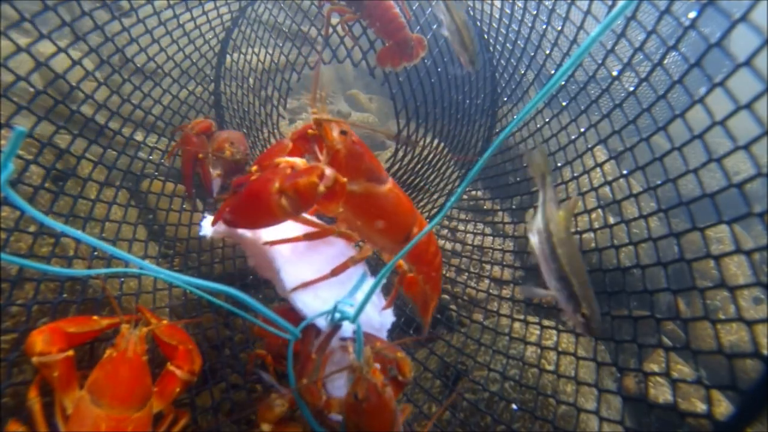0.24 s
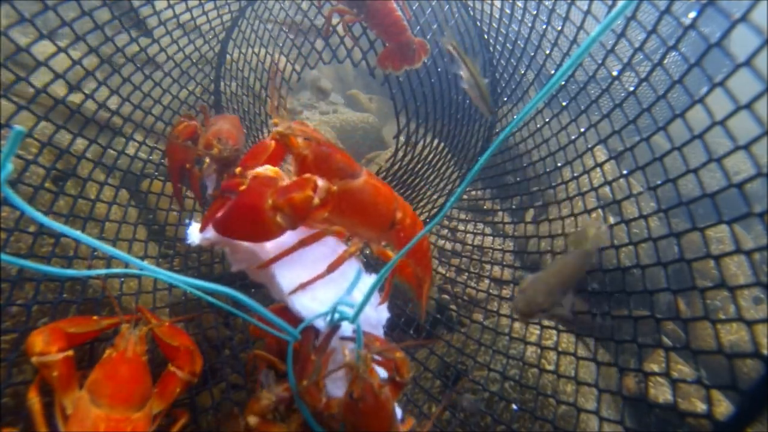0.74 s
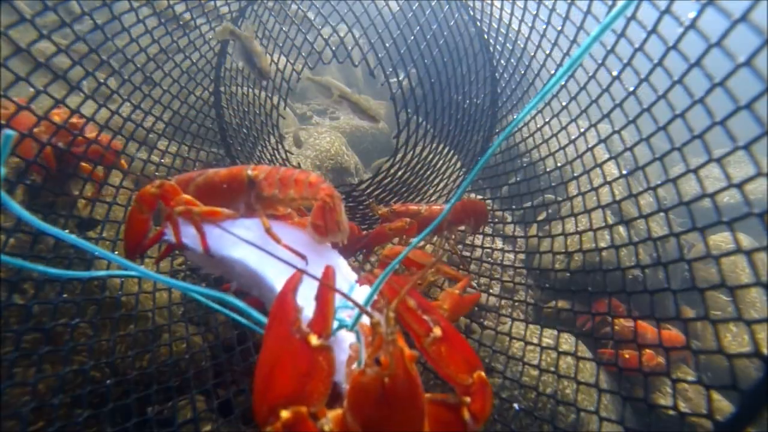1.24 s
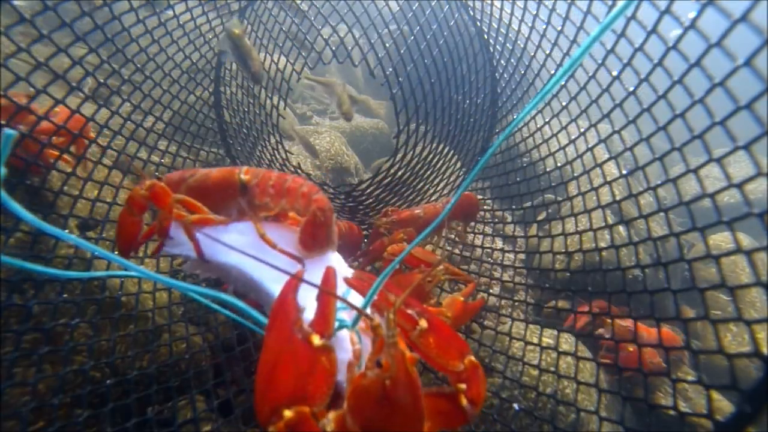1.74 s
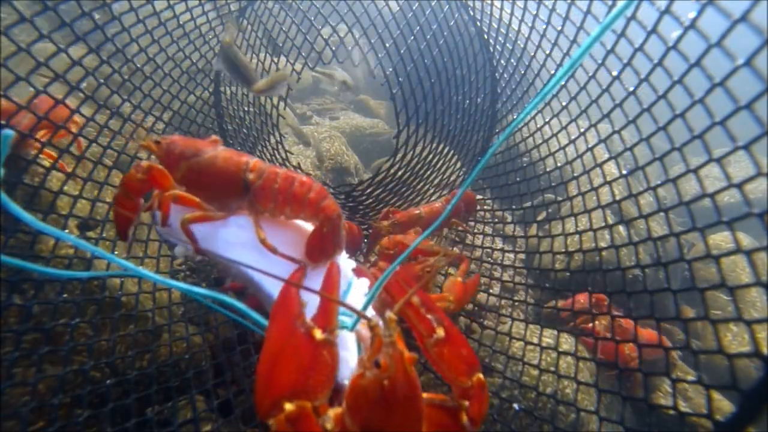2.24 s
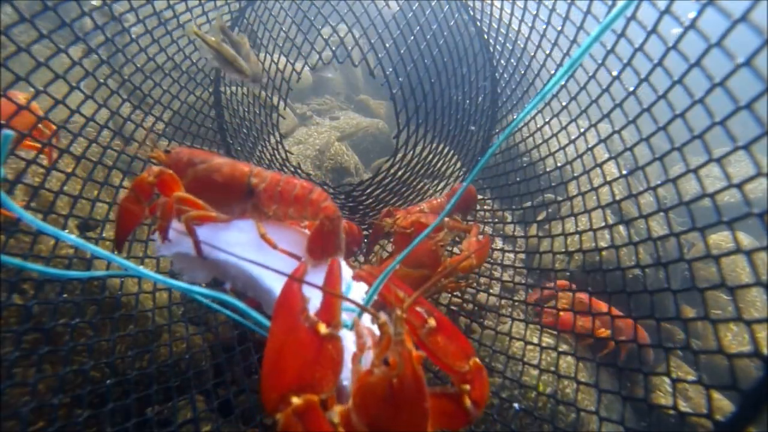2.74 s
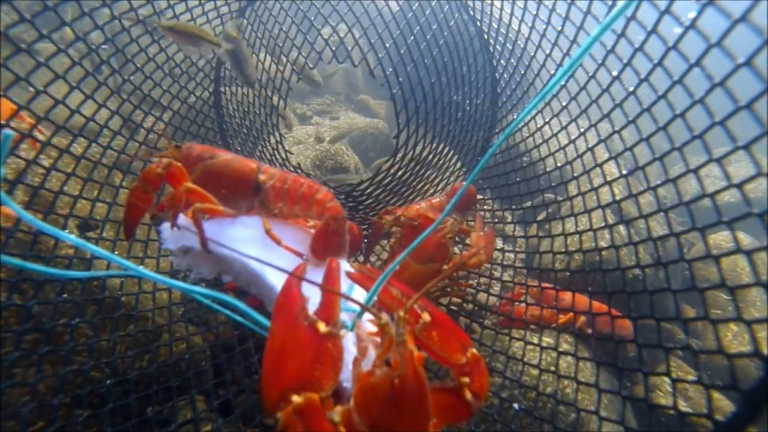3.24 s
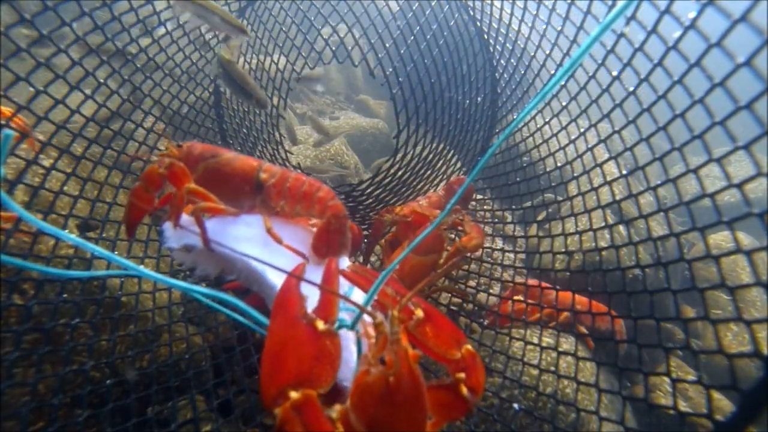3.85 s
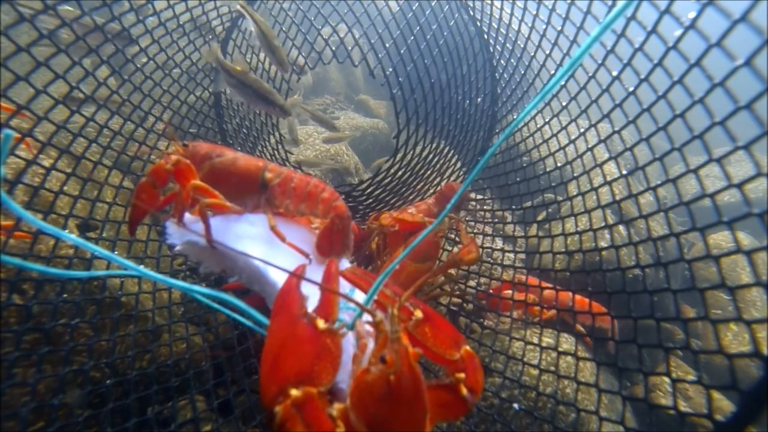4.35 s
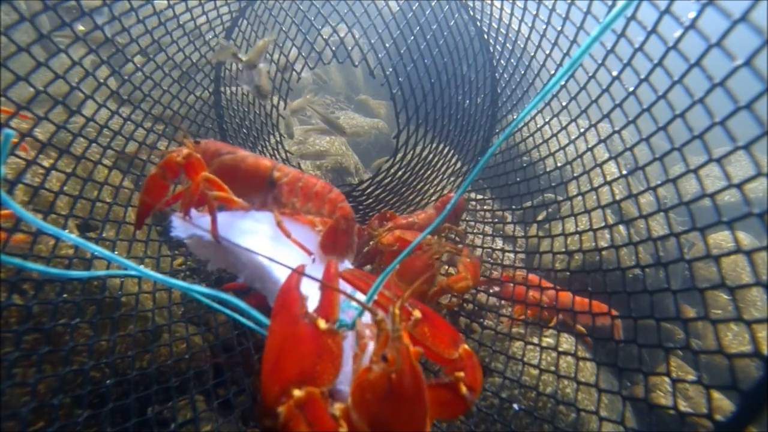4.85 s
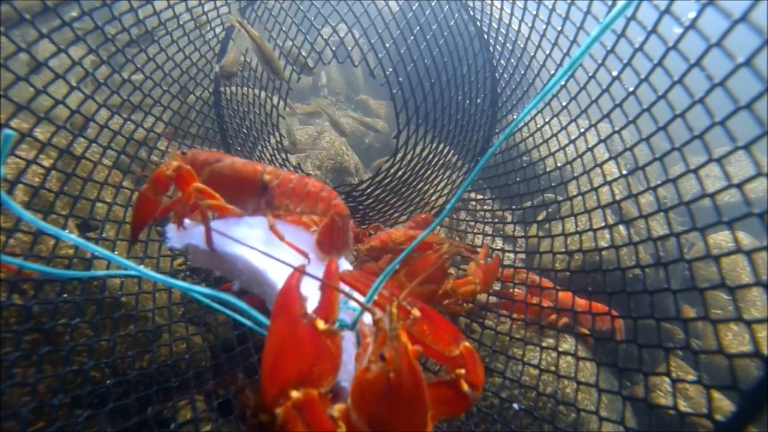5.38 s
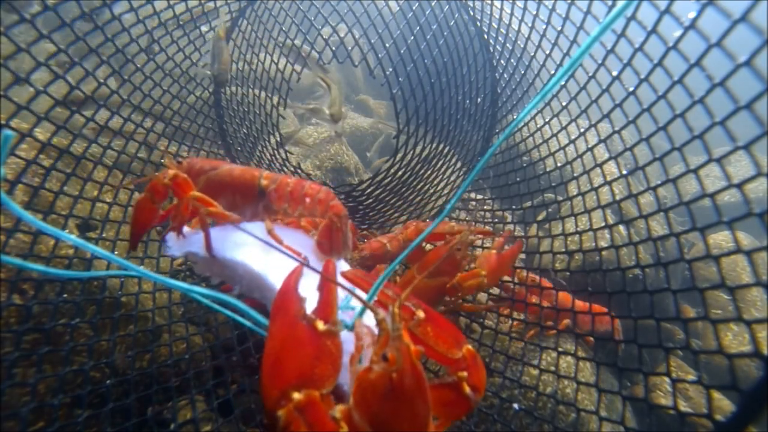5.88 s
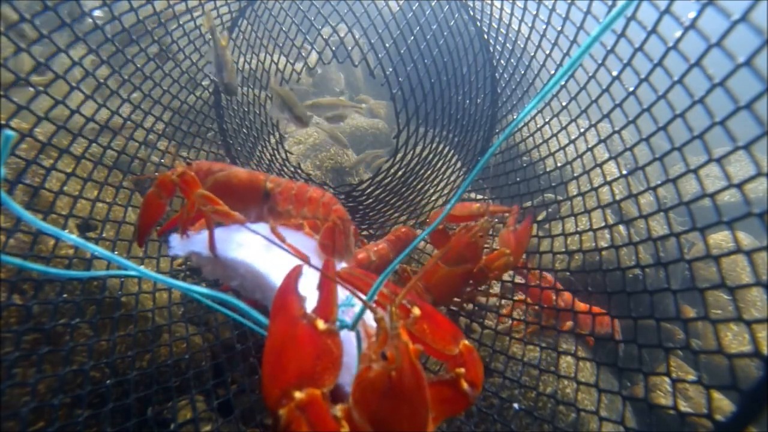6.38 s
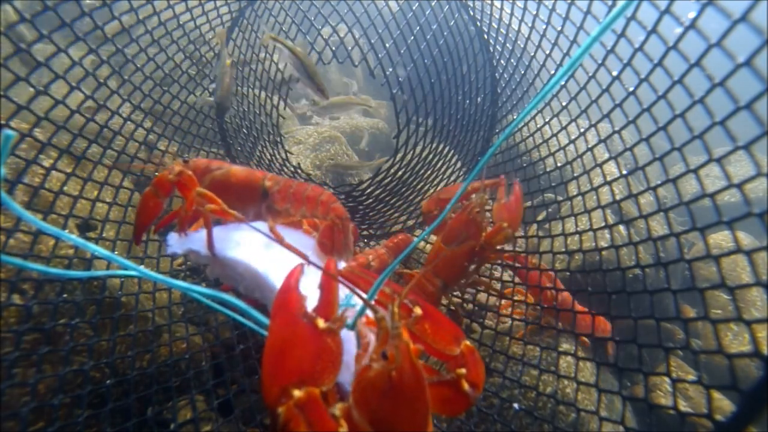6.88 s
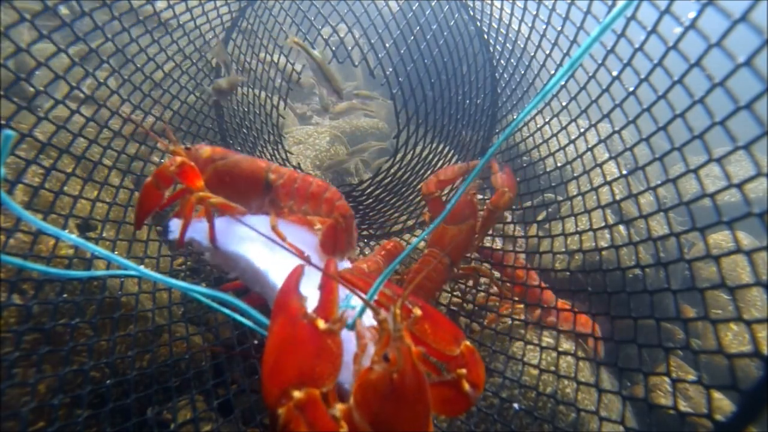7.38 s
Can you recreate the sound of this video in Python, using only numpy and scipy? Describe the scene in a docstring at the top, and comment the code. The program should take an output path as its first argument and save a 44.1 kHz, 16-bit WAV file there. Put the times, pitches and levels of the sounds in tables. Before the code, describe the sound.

Close, muffled, mono underwater sound: shells and claws tap the mesh with short, woody, quickly damped knocks, while legs rub in brief scratchy strokes. Soft low bumps rock the trap. The activity is scattered at first, quiets around two to three seconds, then becomes busy and continues to the end. A quiet electronic hiss and thin buzzing whine stay constant over a barely felt current.

```python
"""Crayfish trap on a river bed

A camera in a sealed housing is fixed inside a wire-mesh trap on a river bed.
Close by, legs and claws scrape, knock and drag on the mesh; filtered slips and blows set frame, mesh,
housing and wires ringing in tuned modes. Shoves sway the whole trap. The current is deep, narrow noise;
the camera's electronics add shaped hiss, a thin steady tone and a whine that restarts with each picture.
"""
import sys
import numpy as np
from scipy import signal
from scipy.fft import rfft, irfft
from scipy.io import wavfile

SR = 44100
rng = np.random.default_rng(int(sys.argv[2]) if len(sys.argv) > 2 else 0)


def materialize(psi):
    """Save the field psi as 16-bit PCM at rate SR to the path in sys.argv[1].

    A 1-D psi becomes a single channel; in a 2-D psi each row is a channel.
    """
    bounded = np.clip(np.atleast_2d(psi).T, -1, 1)
    quanta = np.round(bounded * 32767).astype(np.int16)
    wavfile.write(sys.argv[1], SR, quanta)


N = 336042     # length in samples


def from_db(db):
    """Gain of a level in dB."""
    return 10 ** (np.asarray(db) / 20)


def rms_one(x):
    """Scaled to rms 1."""
    return x / np.sqrt(np.mean(x ** 2) + 1e-20)


def dull(x, cutoff_hz):
    """Steep low-pass: takes the treble out of a force or noise."""
    return signal.sosfilt(signal.butter(4, cutoff_hz, fs=SR, output="sos"), x)


def in_time(rows):
    """Columns of a curve table, interpolated at every sample."""
    s, *columns = np.transpose(rows)
    return [np.interp(np.arange(N) / SR, s, column) for column in columns]


def drift(rate_hz):
    """Slow chance: noise at every 40th sample through a double one-pole low-pass; spread 1."""
    step = 40
    r = np.exp(-2 * np.pi * rate_hz * step / SR)
    noise = rng.standard_normal(N // step + 2002)
    slow = signal.lfilter([1], [1, -2 * r, r * r], noise)[2000:]     # drop the filter's run-in
    return np.interp(np.arange(N) / step, np.arange(len(slow)), rms_one(slow))


def grains(per_s, spread_db, count):
    """Random clicks of uneven size and sign over count samples."""
    sizes_db = spread_db * np.minimum(rng.exponential(1, count), 4)
    sizes = from_db(sizes_db) * rng.choice([-1, 1], count)
    return sizes * (rng.random(count) < per_s / SR)


# The deep flow noise
FLOW_DB, FLOW_HZ = -51.5, 11.7     # middle rms level, pitch of the slow swing


def current():
    """The river rocks the housing: a deep rumble around one slow swing, its level drifting."""
    edges_hz = [FLOW_HZ / 1.25, FLOW_HZ * 1.2]
    band = signal.butter(1, edges_hz, "band", fs=SR, output="sos")
    rumble = dull(signal.sosfilt(band, rng.standard_normal(N)), 60)
    return from_db(FLOW_DB + 3.1 * drift(1.3)) * rms_one(rumble)


# Spectrum of the electronics' hiss: pitch_hz [Hz], relative level_db [dB per Hz]
HISS = [(30, 18.5), (1000, 14.5), (3300, 2), (4200, 2.5), (6300, 1), (9000, -3), (10700, -2), (12100, -8),
        (13000, -7.5), (15000, -12)]
# Unbroken runs of pictures, the rhythm skipping between them: first_s [s], last_s [s]
PICTURE_RUNS = [(-.01231, .905), (.91528, 7.62)]
# Whine during readout: pitch_hz [Hz], level_db [dB rms]
WHINE = [(5706, -67.5), (11412, -70)]
HISS_DB = -64.5     # rms
PICTURES_PER_S = 59.94
READOUT_SHARE = 0.4     # part of each picture during which the sensor is read
TONE_HZ, TONE_DB = 2999.66, -81     # level in dB rms


def electronics():
    """Hiss, a thin steady tone, and a whine that starts anew with each picture's readout."""
    t = np.arange(N) / SR
    hz = np.maximum(np.arange(N // 2 + 1) * SR / N, 1)
    shape_hz, shape_db = np.transpose(HISS)
    shape = from_db(np.interp(np.log(hz), np.log(shape_hz), shape_db))
    hiss = from_db(HISS_DB) * rms_one(irfft(rfft(rng.standard_normal(N)) * shape, N))
    whine = 0
    for first_s, last_s in PICTURE_RUNS:
        picture, part = np.divmod((t - first_s) * PICTURES_PER_S, 1)
        since_s = part / PICTURES_PER_S
        in_run = (picture >= 0) & (t - since_s < last_s + .001)
        reading = (part < READOUT_SHARE) & in_run
        phase = 2.1 * drift(7)     # the phase wanders [rad]
        for pitch_hz, level_db in WHINE:
            whine = whine + reading * from_db(level_db) * np.sin(2 * np.pi * pitch_hz * since_s + phase)
    tone = from_db(TONE_DB) * np.sin(2 * np.pi * TONE_HZ * t)
    return hiss + np.sqrt(2) * (whine + tone)     # a sine of rms 1 peaks at sqrt(2)


# Ringing modes of the whole trap, its frame, its mesh, the camera housing and single wires:
# pitch_hz [Hz], width_hz [Hz], level_db [dB, relative gain at that pitch]
SWAY = [(49, 31, -4)]
FRAME = [(98, 6, -22), (112.3, 14.3, -4.5), (119.4, 17, -25), (187.2, 4, -7), (212.3, 7.8, -3.5),
         (242.5, 16.5, -8), (294, 10, -4.5), (317.4, 23, 0.5), (371.7, 10.7, -2), (398, 8.9, -7.5)]
MESH = [(510.5, 14.7, -4), (549.8, 27, -2), (592.6, 38, -1.5), (681.6, 24.5, -5.5), (769, 14.2, -10),
        (808, 60, -17.5)]
HOUSING = [(1003, 11.3, -4), (1090, 64, -1.5), (1195, 65, -0.5), (1326.4, 65, -0.5), (1453.6, 84, -1.5),
           (1542, 90.4, -1), (1700, 83, -7), (1778, 88, -9.5), (2150, 118, -16.5)]
WIRE = [(2290, 205, 3), (2814, 115, 9), (3022, 174, 6), (3342, 345, 6), (3700, 340, -7), (5650, 7500, -28)]
# Low-pass on the force that reaches each body
FRAME_DULL_HZ, MESH_DULL_HZ, HOUSING_DULL_HZ, WIRE_DULL_HZ = 548, 1008, 2530, 4330
IN_STEP_BELOW_HZ = 950     # low modes move the wall together at first


def ring(force, modes, strengths):
    """Parallel resonators, each driven at its own strength; high neighbours swing against each other."""
    out = 0
    for k, ((pitch_hz, width_hz, level_db), strength) in enumerate(zip(modes, strengths)):
        r = np.exp(-np.pi * width_hz / SR)     # wider modes die sooner
        poles = [1, -2 * r * np.cos(2 * np.pi * pitch_hz / SR), r * r]
        sign = 1 if pitch_hz < IN_STEP_BELOW_HZ else (-1) ** k
        mode = signal.lfilter([1 - r, 0, r - 1], poles, force * strength + 1e-18)
        out = out + sign * from_db(level_db) * mode
    return out


def rubbed(force, modes, patchy_db):
    """The contact point wanders, so each mode swells and fades while their joint power holds; rms 1."""
    wander_hz = 12
    swells = np.array([from_db(patchy_db * drift(wander_hz)) for _ in modes])
    _, width_hz, level_db = np.transpose(modes)
    joint = np.sqrt((from_db(level_db) ** 2 * width_hz) @ swells ** 2)
    return rms_one(ring(force, modes, swells / joint))


# Strokes of legs along the mesh: start_s [s], length_s [s], level_db [dB, at the housing],
# weight_db [dB, frame over housing], hardness_db [dB, wire over housing]
STROKES = [(0.0, 0.17, -55, 8.5, -15.5), (0.227, .12, -45, 1, -21.5), (0.411, .07, -53, -1, -21),
           (0.498, 0.098, -54.5, -4.5, -19), (0.698, 0.044, -51.5, -15, -22),
           (0.858, 0.034, -44.5, 1.5, -19), (1.108, 0.11, -49.5, 0, -23), (1.158, 0.039, -52.5, 13, -23),
           (1.257, 0.084, -52.5, 3.5, -20), (1.427, 0.14, -56, 14.5, -20), (1.518, 0.12, -49, 9.5, -27),
           (1.667, 0.14, -51.5, 15, -24), (1.796, 0.091, -45, 6, -26), (1.91, 0.1, -60, 8.5, -20),
           (2.087, 0.053, -61.5, 11, -22), (2.211, 0.14, -57.5, 7, -20), (2.43, 0.082, -51.5, 11, -23),
           (2.548, 0.055, -47, 7.5, -24), (2.63, 0.039, -55, 0, -22), (2.736, 0.022, -44.5, -3, -19),
           (2.817, 0.026, -53, 9, -21), (2.987, 0.04, -64, 15, -24), (3.117, 0.072, -48, 11.5, -23),
           (3.22, 0.073, -63.5, 20.5, -20), (3.451, 0.058, -59, 6.5, -14), (3.582, 0.036, -50, 3, -18),
           (3.79, 0.055, -40.5, 2.5, -32), (3.848, 0.016, -40, 11, -28), (3.909, 0.19, -42, -5, -20),
           (4.163, 0.043, -45, 2.5, -26), (4.228, 0.045, -44, 9, -22), (4.302, .14, -40.5, 6.5, -25),
           (4.497, 0.14, -48, 4.5, -35), (4.692, 0.26, -49.5, -8, -22), (4.79, 0.033, -60, -7, -22),
           (4.865, 0.06, -50.5, -13, -27), (5.055, 0.062, -36, 11, -30), (5.13, 0.11, -45, 13, -28),
           (5.257, 0.048, -44, 5, -25), (5.327, 0.12, -51, 8.5, -23), (5.45, 0.058, -47, -7, -24),
           (5.57, 0.38, -45.5, 6.5, -27.5), (6.035, 0.025, -54, 16.5, -22), (6.197, 0.16, -49.5, 12.5, -28),
           (6.275, .17, -41.5, 1.5, -28), (6.457, 0.12, -49.5, -1.5, -27), (6.571, 0.077, -47.5, 5.5, -27),
           (6.691, 0.082, -53, 1.5, -22), (6.82, 0.077, -53.5, 0.5, -26), (6.934, 0.052, -48, 11, -18),
           (7.043, 0.064, -51.5, -16, -10), (7.291, 0.15, -48, -3.5, -24), (7.401, 0.085, -42, -2, -33),
           (7.518, 0.041, -45.5, 3.5, -16)]
STROKE_ATTACK_S, STROKE_SAG_DB, STROKE_RELEASE_DB_PER_S = 0.0081, 1.5, 394
STROKE_MESH_DB, STROKE_MESH_FOLLOWS = -0.5, 0.53     # mesh over housing; share of the weight
# Faint shuffling that never stops: housing and mesh, frame over housing, wire
STIR_DB, STIR_WEIGHT_DB, STIR_WIRE_DB = -62, 3, -77.5


def stroke_levels():
    """Strokes set in, sag and let go, adding power to the shuffling; gains of frame, mesh, housing, wire."""
    t = np.arange(N) / SR
    stir_db = [[STIR_DB + STIR_WEIGHT_DB], [STIR_DB], [STIR_DB], [STIR_WIRE_DB]]
    power = np.ones((4, N)) * from_db(stir_db) ** 2
    for start_s, length_s, level_db, weight_db, hardness_db in STROKES:
        part = slice(int(start_s * SR), int((start_s + length_s + .15) * SR))
        since_s = t[part] - start_s
        sag_db = STROKE_SAG_DB * np.minimum(since_s / length_s, 1)
        release_db = STROKE_RELEASE_DB_PER_S * np.maximum(since_s - length_s, 0)
        attack = np.minimum(since_s / STROKE_ATTACK_S, 1)
        shape = attack * from_db(level_db - sag_db - release_db)
        mesh_db = STROKE_MESH_DB + STROKE_MESH_FOLLOWS * weight_db
        shares_db = np.array([weight_db, mesh_db, 0, hardness_db])
        power[:, part] += (shape * from_db(shares_db)[:, None]) ** 2
    return np.sqrt(power)


RUB_DULL_HZ = 1870     # a soft leg excites the housing less high than a blow
SWAY_REST_DB = -55     # constant rms, before the 45 Hz cut in scene()


def scraping():
    """One clumped stream of tiny slips sets frame, mesh, housing, wires and the whole trap ringing."""
    frame, mesh, housing, wire = stroke_levels()
    slips = grains(2500, spread_db=3.0, count=N) * from_db(2.3 * drift(37.5))
    frame = frame * rubbed(dull(slips, FRAME_DULL_HZ), FRAME, patchy_db=3.5)
    mesh = mesh * rubbed(dull(slips, MESH_DULL_HZ), MESH, patchy_db=2.5)
    housing = housing * rubbed(dull(slips, RUB_DULL_HZ), HOUSING, patchy_db=4.0)
    wire = wire * rubbed(dull(slips, WIRE_DULL_HZ), WIRE, patchy_db=0.5)
    sway = from_db(SWAY_REST_DB) * rubbed(dull(slips, 79.0), SWAY, patchy_db=0)
    return frame + mesh + housing + wire + sway


# Shoves that rock the whole trap: start_s [s], level_db [dB peak of one shove, before the 45 Hz cut]
SHOVES = [(0.029, -37), (0.282, -33), (0.452, -36), (.69, -45), (0.828, -35), (1.14, -54), (1.349, -41),
          (1.73, -42), (2.0, -46), (2.42, -44), (2.509, -40), (2.72, -50), (3.13, -50), (3.2, -44),
          (3.85, -38), (4.3, -41), (4.401, -33), (4.539, -35.5), (4.779, -42), (4.902, -45), (5.07, -41),
          (5.2, -35), (5.35, -37), (5.701, -42), (5.87, -37), (6.269, -38), (6.419, -36), (6.631, -44),
          (6.781, -37), (7.57, -46)]
SHOVE_DULL_HZ = 91


def shoves():
    """Each shove is a soft push, to either side, that sets the whole trap swaying."""
    start_s, level_db = np.transpose(SHOVES)
    pushes = np.zeros(N)
    pushes[(start_s * SR).astype(int)] = from_db(level_db) * rng.choice([-1, 1], len(start_s))
    unit_push = np.eye(1, SR // 10)[0]
    sway = ring(dull(pushes, SHOVE_DULL_HZ), SWAY, [1])
    unit_sway = ring(dull(unit_push, SHOVE_DULL_HZ), SWAY, [1])
    return sway / np.abs(unit_sway).max()


# Claws and shells knocking: start_s [s], level_db [dB peak at the housing],
# weight_db [dB, frame over housing], hardness_db [dB, wire over housing],
# pitch_hz [Hz, where the housing rings most], contact_s [s, until the force has dropped 60 dB]
KNOCKS = [(0.0399, -32.5, -16, -26, 1410, 0.072), (0.2317, -26, -27, -29, 1240, 0.075),
          (0.3919, -26, -10, -24, 1130, 0.049), (0.4977, -34, -23, -34, 1330, 0.17),
          (0.5546, -38.5, -7, -20, 1500, 0.047), (0.6898, -30.5, -7, -23, 1490, 0.021),
          (0.832, -12.5, -14, -22.5, 1420, 0.038), (1.1174, -36.5, -17, -29, 1270, 0.028),
          (1.2237, -42, -21, -14, 1540, 0.046), (1.3337, -26.5, 0, -31, 1150, 0.055),
          (1.3631, -23, -3, -27, 1360, 0.052), (1.5413, -32.5, -12, -29, 1360, 0.073),
          (1.6567, -31, -24, -20, 1330, 0.047), (1.7439, -30.5, 1, -31, 1190, 0.051),
          (1.7723, -33, -23, -29, 1530, 0.039), (1.964, -39.5, -20, -25, 1250, 0.032),
          (2.0066, -38.5, -13, -27, 1330, 0.041), (2.0905, -31, -3, -34, 1190, 0.058),
          (2.4151, -24, -0.5, -26, 1230, 0.064), (2.5579, -45, 12, -35, 1300, 0.048),
          (2.6768, -40, -18, -14, 1300, 0.073), (2.717, -25, 0, -30.5, 1340, 0.055),
          (2.8739, -42, -1, -23, 1160, 0.046), (2.9846, -34, -9, -29, 1470, 0.069),
          (3.0654, -40, -10, -23, 1590, 0.039), (3.1039, -42, -3, -31, 1270, 0.062),
          (3.2628, -14.5, -10.5, -18.5, 1620, 0.059), (3.5586, -31, -8, -28, 1410, 0.053),
          (3.6518, -37.5, 4, -45, 1140, 0.086), (3.674, -24.5, -13.5, -10.5, 1590, 0.039),
          (3.7794, -30.5, -12, -27, 1360, 0.045), (3.8162, -30, -8, -19, 1110, 0.029),
          (3.9145, -14.5, -25, -17.5, 1590, 0.039), (3.9952, -28.5, -15, -34, 1550, 0.055),
          (4.1614, -33.5, -24, -25, 1630, 0.1), (4.2918, -24.5, 3, -37, 1120, 0.048),
          (4.5085, -31.5, -2, -27, 1130, 0.16), (4.5389, -26, -12, -22.5, 1190, 0.085),
          (4.6217, -27, -17.5, -18, 1460, 0.041), (4.6982, -59, -30, -28, 1500, 0.11),
          (4.7234, -32, -40, -32, 1470, 0.17), (4.7746, -20, 0, -31.5, 1150, 0.08),
          (4.8634, -30, -16, -15, 1590, 0.14), (4.9077, -22.5, -3.5, -29, 1080, 0.037),
          (4.9781, -28, -11.5, -21, 1590, 0.06), (5.0303, -26, -27, -20, 1446, 0.026),
          (5.0539, -20.5, 1.5, -23.5, 1180, 0.065), (5.214, -24.5, -6.5, -22.5, 1140, 0.085),
          (5.275, -28.5, -21, -18, 1250, 0.032), (5.3715, -31.5, 6.5, -43, 1260, 0.02),
          (5.4446, -27, -17, -28, 1460, 0.04), (5.5378, -37, -10, -20, 1300, 0.17),
          (5.5798, -33.5, 8, -24, 1450, 0.055), (5.6323, -27, -7, -34, 1190, 0.051),
          (5.653, -29.5, -3, -42, 1200, 0.042), (5.8635, -37, 16.5, -48, 1330, 0.032),
          (5.9534, -44, -6, -29, 1120, 0.035), (6.0995, -46, 12.5, -37, 1180, 0.038),
          (6.1825, -33.5, 4, -33, 1190, 0.067), (6.2295, -38, -5, -31, 1480, 0.065),
          (6.282, -17.5, -4.5, -24, 1450, 0.035), (6.3497, -31, -5, -39, 1190, 0.051),
          (6.4086, -19, -7.5, -31, 1540, 0.034), (6.5986, -29, -13, -24, 1460, 0.03),
          (6.6364, -32, -1.5, -31, 1260, 0.045), (6.732, -35, -13, -20, 1040, 0.084),
          (6.7975, -26.5, -12, -22, 1450, 0.037), (6.9417, -21.5, -7, -40, 1280, 0.034),
          (7.0887, -32, -19, -19, 1560, 0.03), (7.1211, -36, -12, -28, 1240, 0.077),
          (7.1735, -24, -14, -24, 1560, 0.057), (7.225, -23.5, -25.5, -18, 1570, 0.047),
          (7.3146, -44, -18, -23, 1340, 0.047), (7.389, -23.5, -20, -34, 1480, 0.03),
          (7.4289, -30, -27, -26, 1290, 0.033), (7.4566, -18.5, -8, -27.5, 1630, 0.05),
          (7.5274, -23, -11, -28, 1340, 0.086), (7.5871, -22.5, -16.5, -21, 1240, 0.051)]
KNOCK_MESH_DB, KNOCK_MESH_FOLLOWS = 1.5, 0.5     # mesh over housing; share of the weight
KNOCK_FOCUS_DB = 16     # housing modes an octave from the favoured pitch lose this much


def knocks():
    """A blow is a first tick and a rattle that holds, then drops; it strikes every mode with a new strength."""
    out, size = np.zeros(N + SR), SR // 6
    since_s = np.arange(size) / SR
    fade = np.minimum(1, np.arange(size)[::-1] / 800)
    for start_s, level_db, weight_db, hardness_db, favoured_hz, contact_s in KNOCKS:
        rattle = rms_one(grains(2500, spread_db=2.5, count=size))
        rattle[0] = 15.6     # the first tick
        force = rattle * from_db(-60 * (since_s / max(contact_s, .005)) ** 1.724)
        hardness = np.clip((hardness_db + 43.5) / 12, -1.5, 2)
        start = round((start_s - .002) * SR)     # the sound needs a moment to build up to its peak
        mesh_db = KNOCK_MESH_DB + KNOCK_MESH_FOLLOWS * weight_db
        bodies = [(HOUSING, HOUSING_DULL_HZ, 0), (FRAME, FRAME_DULL_HZ, weight_db),
                  (MESH, MESH_DULL_HZ, mesh_db), (WIRE, WIRE_DULL_HZ, hardness_db)]
        for modes, dull_hz, share_db in bodies:
            pitch_hz = np.array(modes)[:, 0]
            if modes is HOUSING:
                tilt_db = -KNOCK_FOCUS_DB * np.abs(np.log2(pitch_hz / favoured_hz))
            else:     # harder blows favour the upper modes
                tilt_db = 10.6 * hardness * np.log2(pitch_hz / pitch_hz[0])
            strengths = from_db(tilt_db + rng.normal(0, 2.4, len(modes)))
            sound = ring(dull(force, dull_hz), modes, strengths)
            out[start:][:size] += from_db(level_db + share_db) * fade * sound / np.abs(sound).max()
    return out[:N]


# A claw dragged across the wires, as a curve: start_s [s], slips_per_s [1/s, middle rate],
# level_db [dB, mesh]
DRAG = [(5.6, 80, -40.5), (5.606, 66.6, -46), (5.658, 74.9, -33.5), (5.742, 54, -34), (5.796, 77.5, -31.5),
        (5.84, 83.7, -38), (5.882, 85, -31.5), (5.96, 70, -48)]


def dragging():
    """Nearly even slips, uneven in strength, ring the mesh and slightly more strongly the frame."""
    slips_per_s, level_db = in_time(DRAG)
    turns = np.cumsum(slips_per_s * (1 + 0.054 * drift(43))) / SR
    ticks = np.diff(np.floor(turns), prepend=0)     # one slip per whole turn
    slips = ticks * from_db(1.6 * rng.standard_normal(N))
    t = np.arange(N) / SR
    from_ends_s = np.minimum(t - DRAG[0][0], DRAG[-1][0] - t)
    contact = np.clip(from_ends_s / 0.0081, 0, 1)
    mesh = rubbed(dull(slips, MESH_DULL_HZ), MESH, patchy_db=4.5)
    frame = rubbed(dull(slips, FRAME_DULL_HZ), FRAME, patchy_db=3)
    return contact * from_db(level_db) * (mesh + from_db(1) * frame)


def scene():
    """Trap sounds, thinned steeply below 45 Hz, current and electronics are summed into one channel."""
    above_45_hz = signal.butter(4, 45, "high", fs=SR, output="sos")
    trap = signal.sosfilt(above_45_hz, scraping() + knocks() + dragging() + shoves())
    return (trap + current() + electronics())[None]


CUTOFF_HZ = 15050


def record(dry):
    """The top is cut steeply."""
    low_pass = signal.ellip(12, .5, 60, CUTOFF_HZ, fs=SR, output="sos")
    return signal.sosfilt(low_pass, dry)


dry = scene()
out = record(dry)
materialize(out)
```